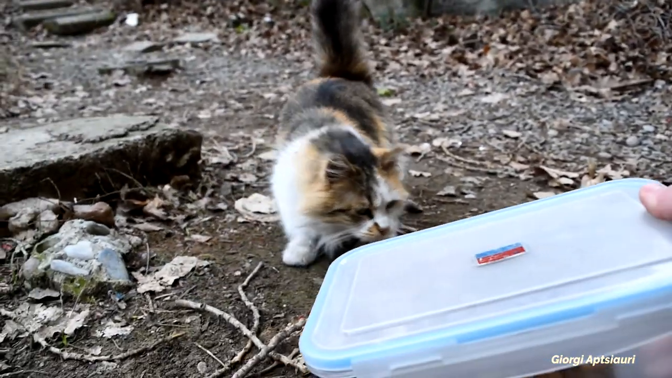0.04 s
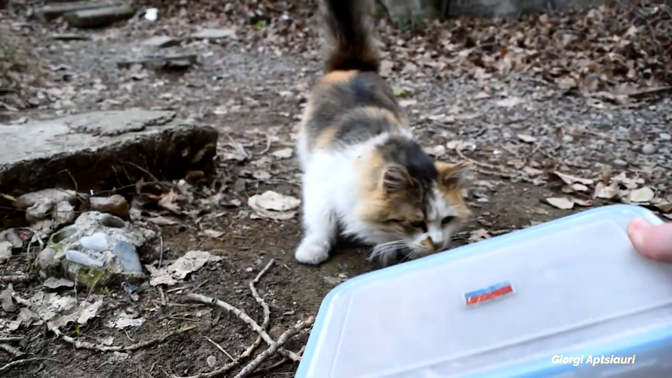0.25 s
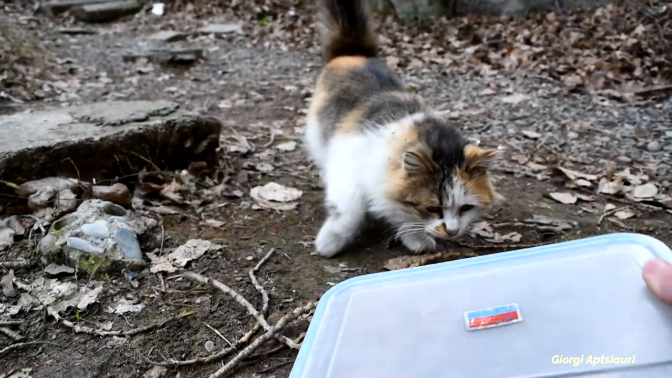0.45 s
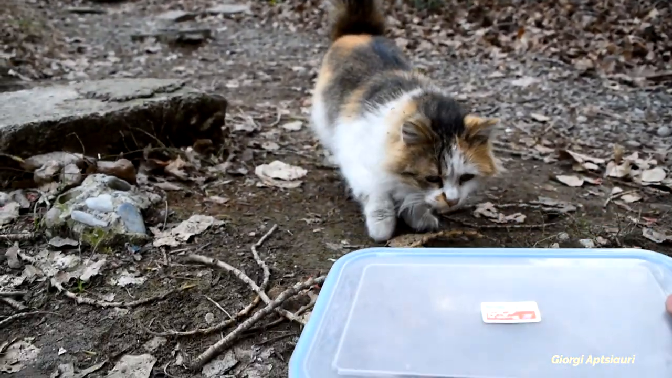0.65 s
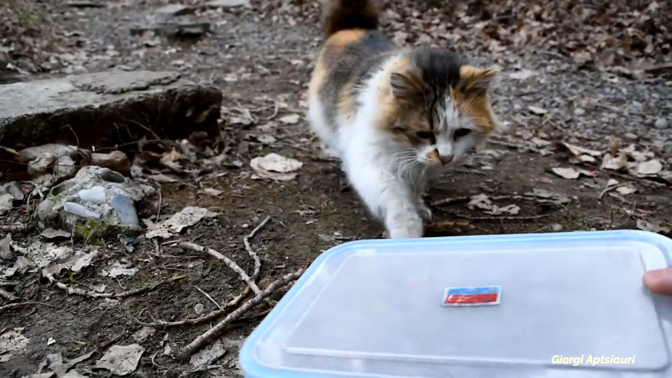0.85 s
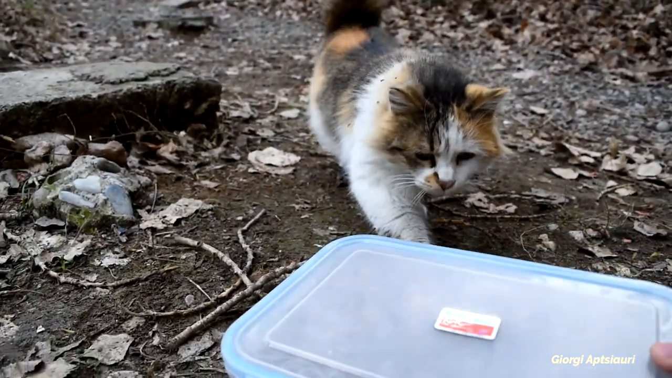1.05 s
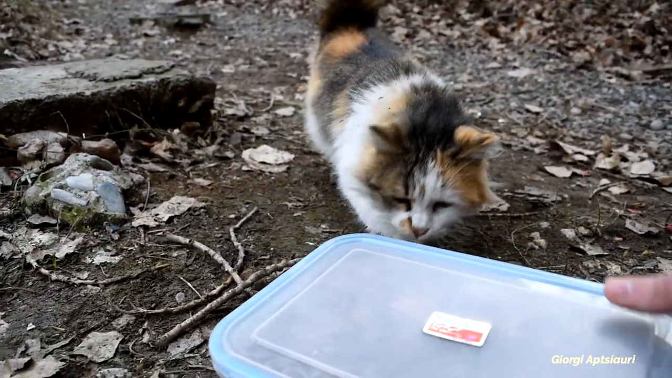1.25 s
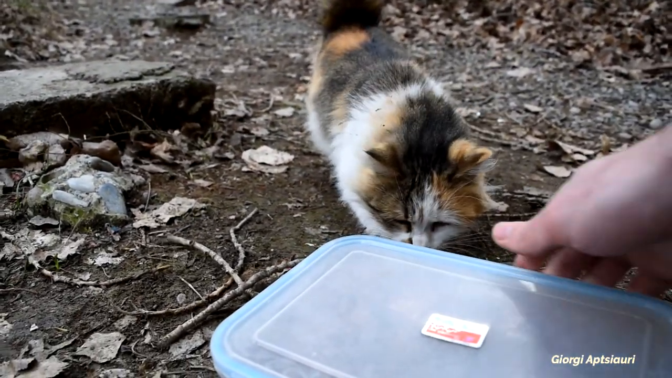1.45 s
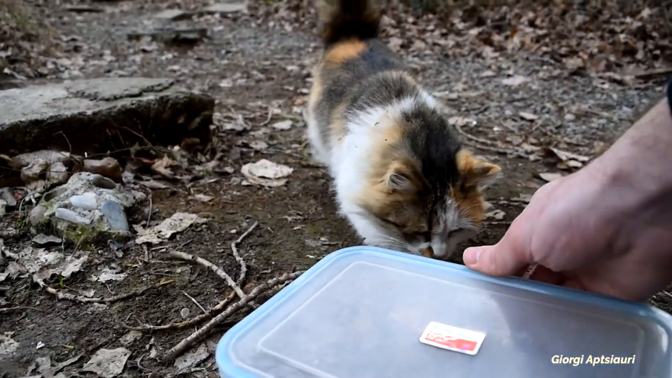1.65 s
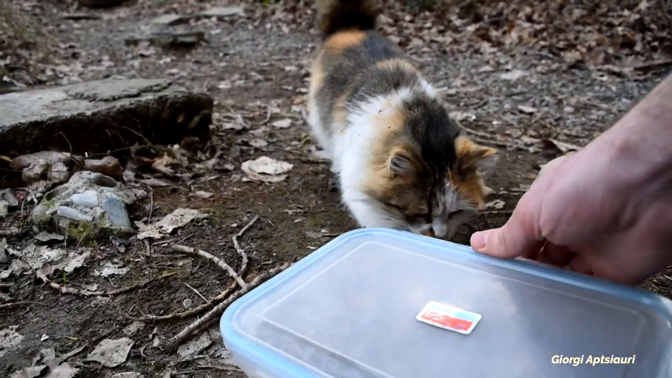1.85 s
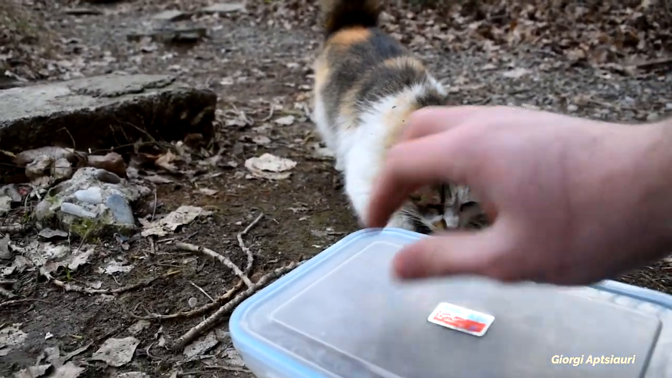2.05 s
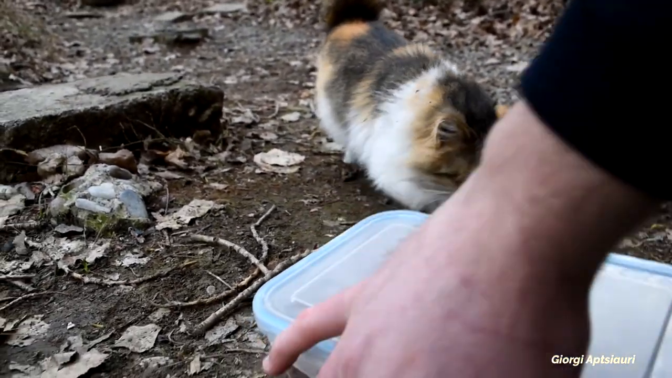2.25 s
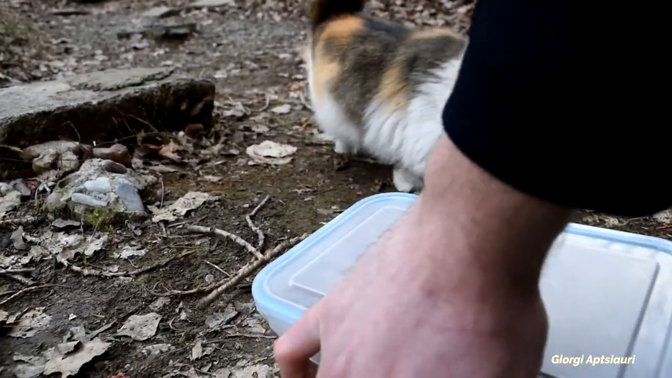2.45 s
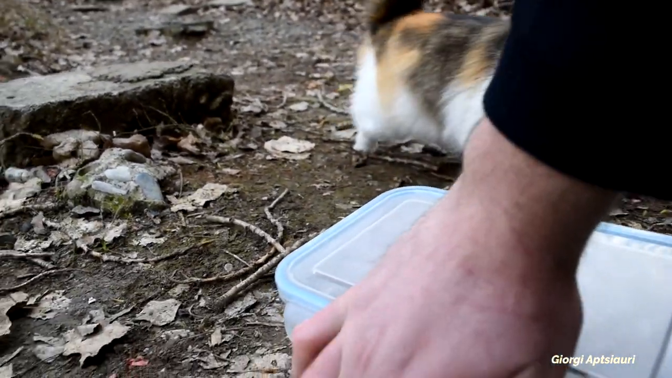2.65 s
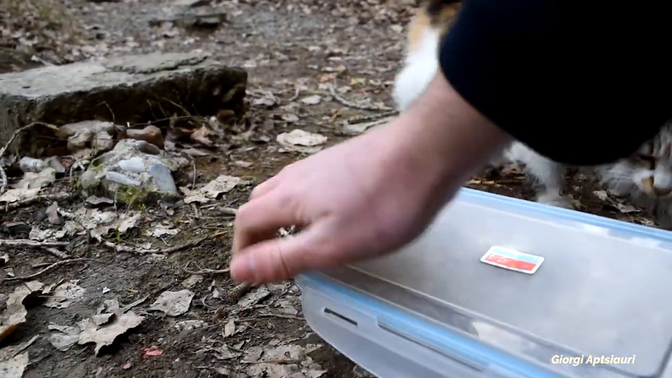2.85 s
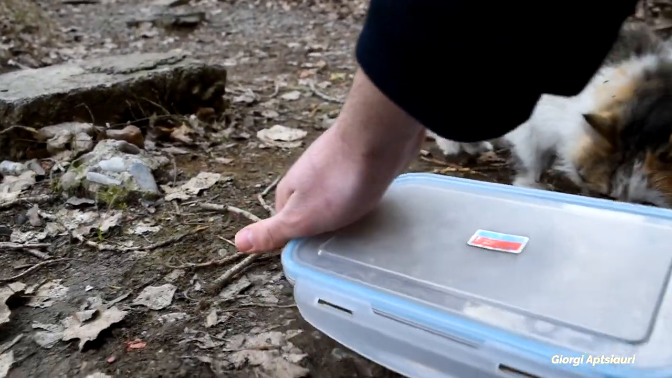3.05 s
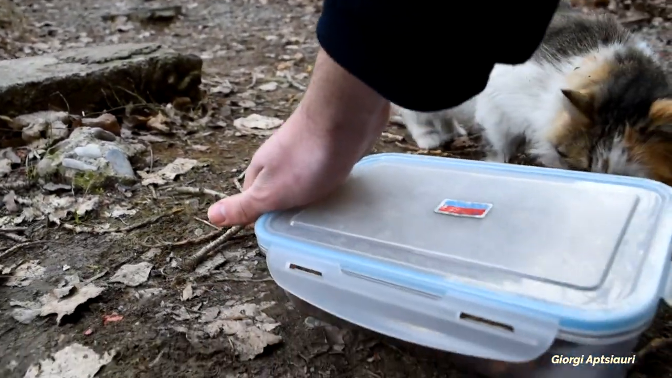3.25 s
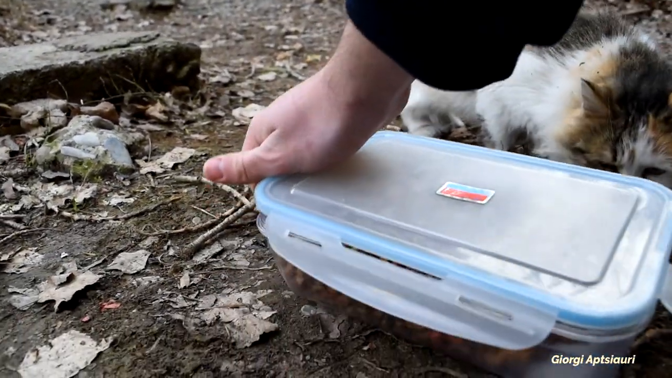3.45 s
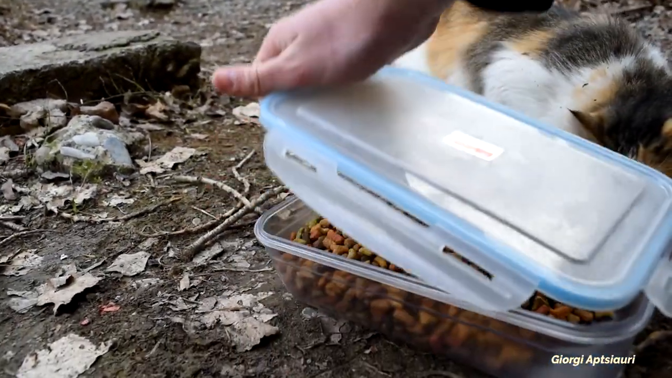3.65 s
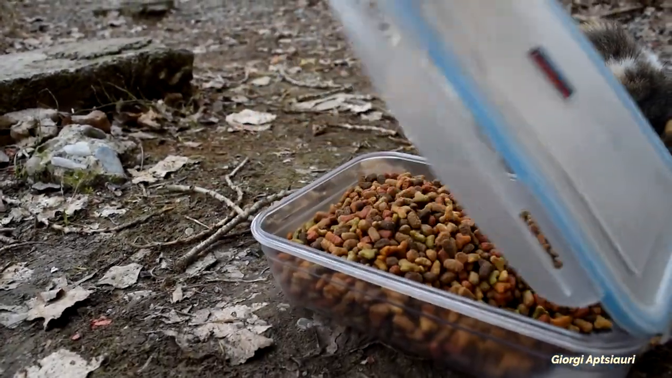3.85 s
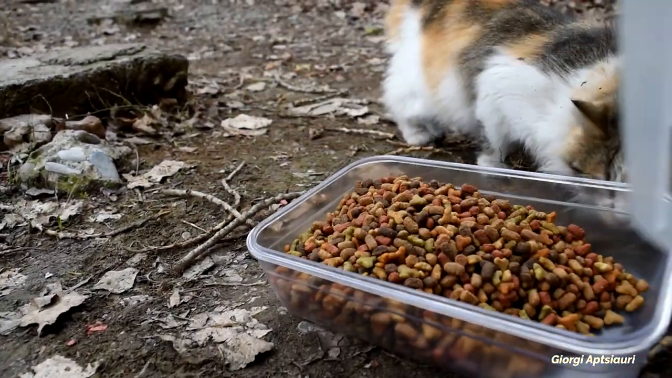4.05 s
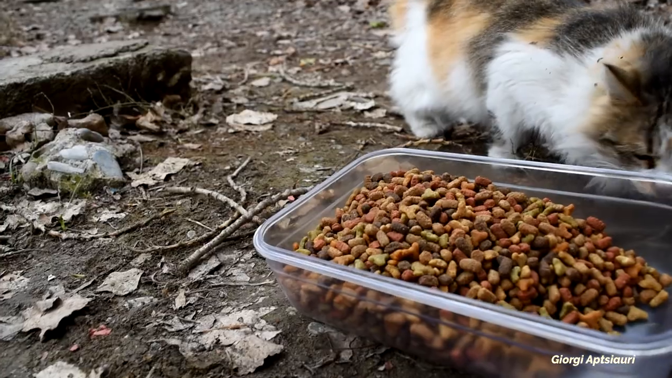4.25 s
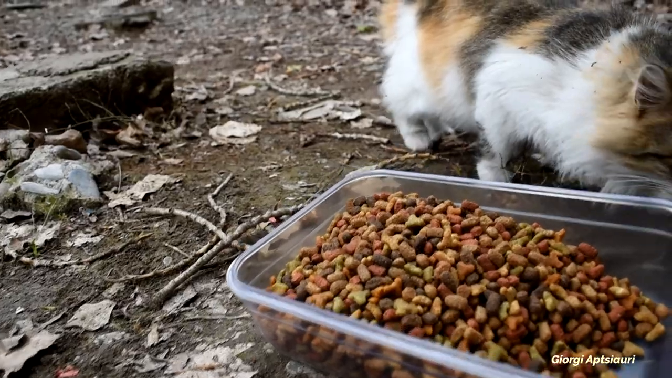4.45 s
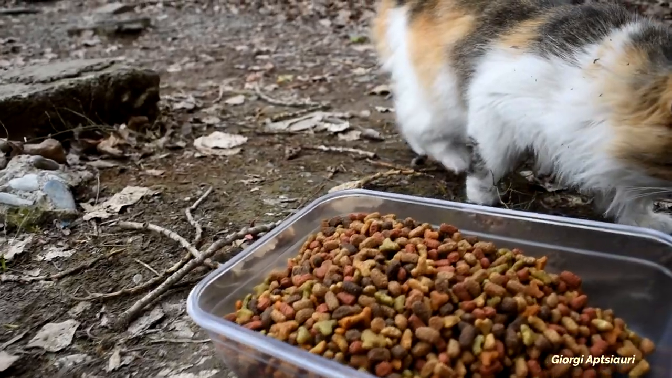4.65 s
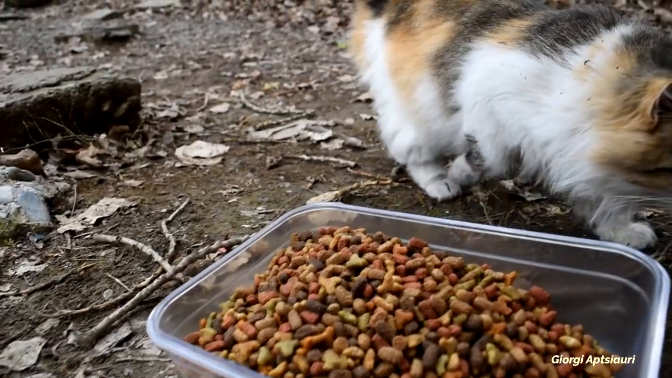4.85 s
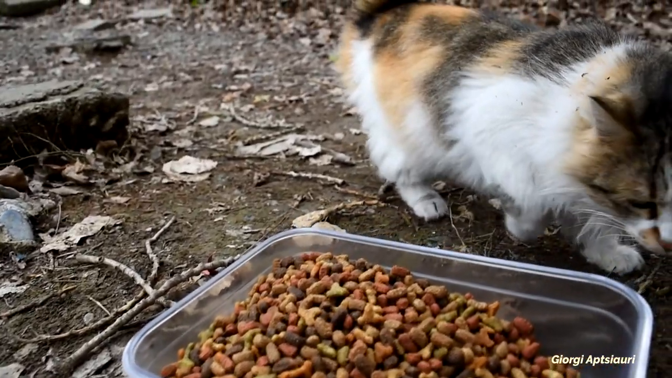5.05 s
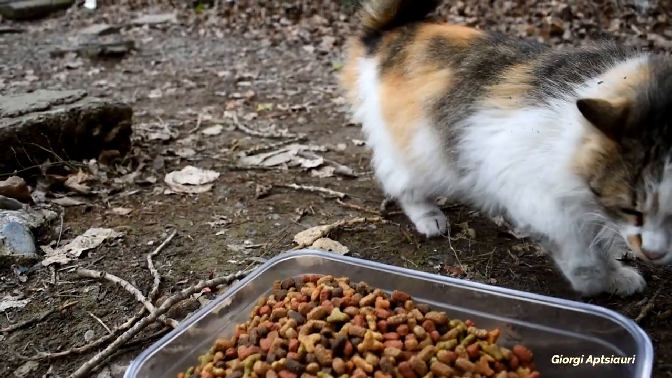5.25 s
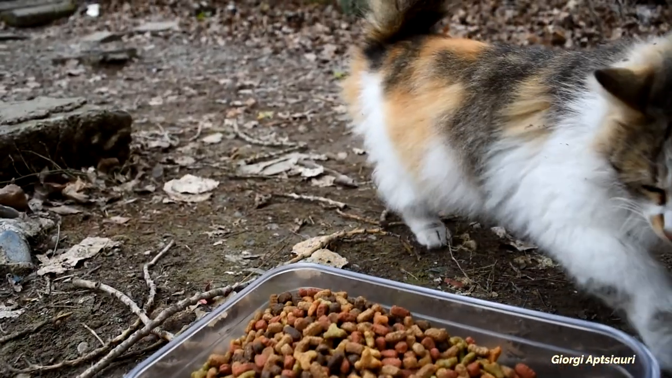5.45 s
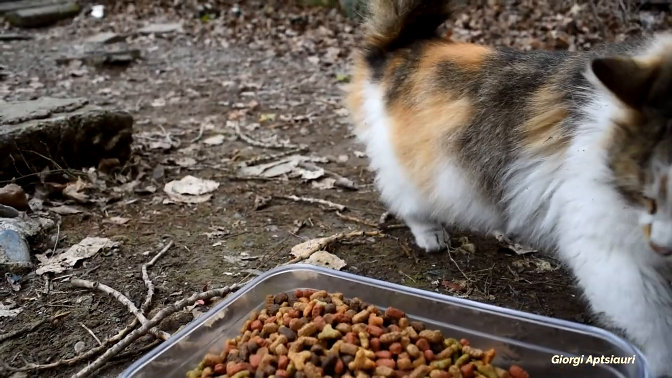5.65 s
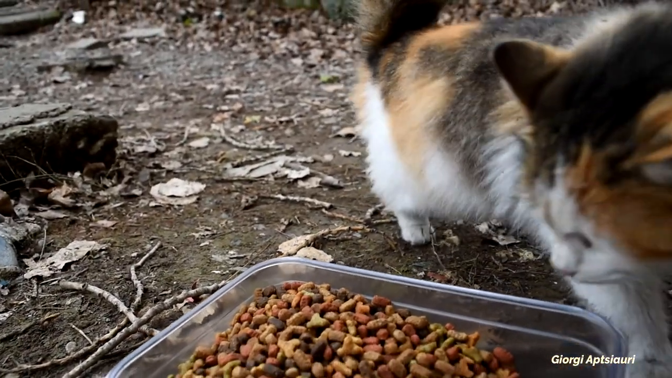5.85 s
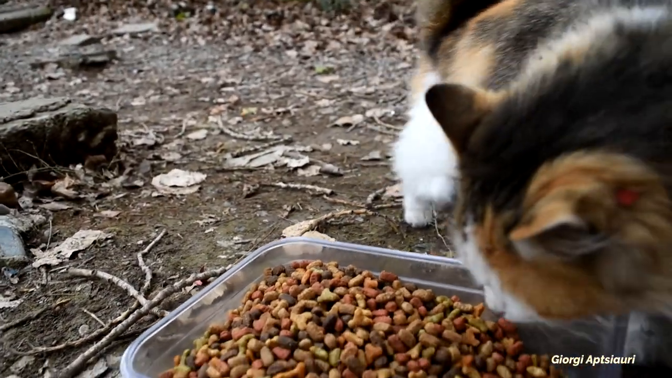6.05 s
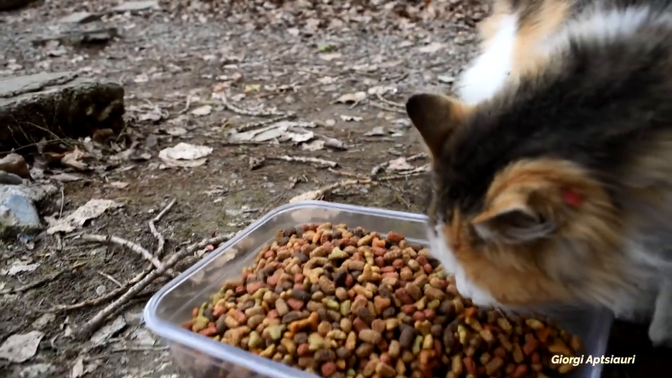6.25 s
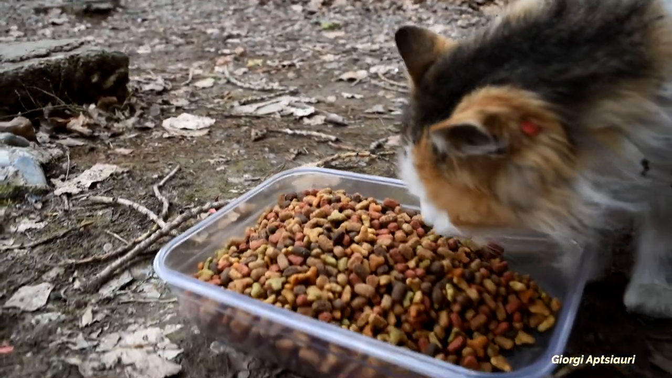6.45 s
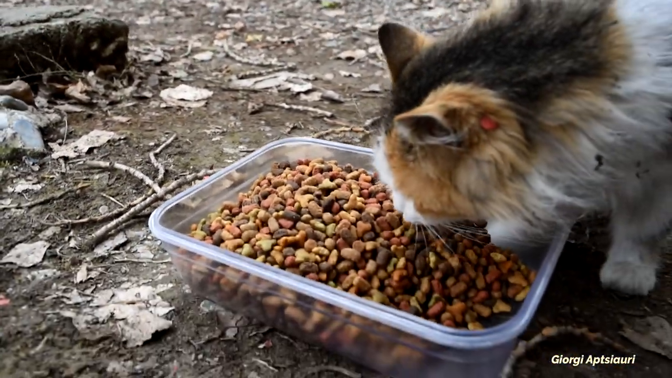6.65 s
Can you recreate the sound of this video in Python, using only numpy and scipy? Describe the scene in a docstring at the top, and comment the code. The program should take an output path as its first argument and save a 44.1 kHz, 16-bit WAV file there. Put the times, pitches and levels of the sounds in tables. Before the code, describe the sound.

Close plastic clicks, dull box thumps and a loose lid clatter, then sharp scrapy ticks to the right, with far sparrow chirps and low traffic.

```python
"""A hard tick and a brush of sleeves come first, close by, over far town rumble and a faint whine.
Then a plastic food box is unlatched and opened outdoors: pops and lid knocks ring decaying modes,
while ticks, scuffs, short hollow notes, rustles and one long dull swell are shaped noise.
Far off a sparrow chirps as sliding sines with echoes; the rumble is noise with resonant drones,
and the electronics whine as a stack of high overtones."""
import sys
import numpy as np
from scipy import signal
from scipy.fft import rfft, irfft, next_fast_len
from scipy.io import wavfile

SR = 44100
rng = np.random.default_rng(int(sys.argv[2]) if len(sys.argv) > 2 else 0)


def transcribe(signal):
    """Save signal, clipped to [-1, 1], as a 16-bit WAV file at the path in sys.argv[1]."""
    frames = np.atleast_2d(signal).T
    limited = np.clip(frames, -1, 1)
    pcm = np.round(limited * 32767).astype(np.int16)
    wavfile.write(sys.argv[1], SR, pcm)


def rack_gain(trim_db):
    """Turn a fader trim in dB into the linear factor to multiply a signal by."""
    fader = np.asarray(trim_db, float)
    return 10 ** (fader / 20)


N = 295639
TIME = np.arange(N) / SR
HZ = np.fft.rfftfreq(N, 1 / SR) + 1     # the offset keeps the log axis finite


def rms_one(x):
    """Scale to rms 1."""
    return x / np.sqrt(np.mean(x ** 2) + 1e-20)


def in_time(rows):
    """Read the columns of a curve at every sample."""
    s, *columns = np.transpose(rows)
    return [np.interp(TIME, s, c) for c in columns]


def at_hz(points, hz):
    """Read a spectrum on a log frequency axis."""
    point_hz, point_db = np.transpose(points)
    return np.interp(np.log(hz), np.log(point_hz), point_db)


def drift(rate_hz):
    """Random wander of rms 1, with nothing faster than about rate_hz."""
    count = int(N / SR * rate_hz * 2) + 3
    return rms_one(signal.resample(rng.standard_normal(count), N))


def resonance(x, hz, width_hz):
    """Two-pole band with gain 1 on top."""
    r = np.exp(-np.pi * width_hz / SR)
    poles = [1, -2 * r * np.cos(2 * np.pi * hz / SR), r * r]
    return signal.lfilter([(1 - r * r) / 2, 0, (r * r - 1) / 2], poles, x)


def bell(middle, length, fade=None):
    """Smooth swell and fade; the fade may have a length of its own."""
    width = length if fade is None else np.where(TIME < middle, length, fade)
    return np.exp(-.5 * ((TIME - middle) / width) ** 2)


def near_noise(db, lag_us, blur_hz, pan_db):
    """Noise from close by on the right: it reaches the left microphone later and weaker."""
    right, own = rfft(rng.standard_normal((2, N)))
    alike = 1 / (1 + (HZ / blur_hz) ** 2)
    late = right * np.exp(-2e-6j * np.pi * HZ * lag_us)
    left = alike * late + np.sqrt(1 - alike ** 2) * own
    return rms_one(irfft(np.array([left * rack_gain(pan_db), right]) * rack_gain(db), N))


def struck(blows, modes, octaves, spread_db, lift_db, rounding):
    """A blow rings the modes near its contact pitch most; a harder contact is shorter and so higher."""
    s, db, hardness = np.transpose(blows)
    contact_hz = 150 * 2 ** (2.83 * hardness)
    chance = rng.standard_normal((len(s), len(modes)))
    out = np.zeros(N)
    for k, (hz, mode_db, t60) in enumerate(modes):
        near_db = -6 * (np.log2(hz / contact_hz) / octaves) ** 2
        clicks = np.zeros(N) + 1e-18
        clicks[(s * SR).astype(int)] = rack_gain(db + lift_db + mode_db + near_db + spread_db * chance[:, k])
        r, w = rack_gain(-60 / (t60 * SR)), 2 * np.pi * hz / SR
        ring = signal.lfilter([0, np.sin(w)], [1, -2 * r * np.cos(w), r * r], clicks)
        out += resonance(ring, hz, rounding * hz)     # the soft contact rounds the start
    # a small box cannot radiate deep bass
    return signal.sosfilt(signal.butter(2, 140, "high", fs=SR, output="sos"), out)


# blows on the closed box: t/s, relative peak level/dB, hardness (0-1)
BOX_BLOWS = [(0.586, -38, 0.13), (0.9304, -19.5, 0.49), (0.9354, -25, 0.1), (0.952, -42, 0.6),
             (0.975, -44, 0.42), (0.984, -43, 0.22), (1.576, -35.5, 0.08), (1.658, -39.5, 0.01),
             (1.7748, -17.5, 0.31), (1.7804, -29, 0.54), (1.797, -44, 0.6), (1.972, -38, 0.29),
             (2.415, -45, 0.47), (2.565, -45, 0.7), (2.5727, -25, 0.19), (2.5777, -29, 0.31),
             (2.764, -44.5, 0.42), (2.776, -50, 0.53), (3.021, -28, 0), (3.098, -35.5, 0.01),
             (3.129, -33, 0.07), (3.235, -15.5, 0.15), (3.243, -47, 1), (3.257, -35, 0.27)]
# ringing modes of the hollow box: f/Hz, relative level/dB, decay by 60 dB t/s
BOX_MODES = [(184.3, 1, 0.098), (226.6, 1.5, 0.051), (264, -2, 0.038), (309, 8.5, 0.028), (387, 6, 0.024),
             (459, 8, 0.023), (509, 7, 0.02), (560, -1.5, 0.03), (870, 4, 0.034), (1190, 4, 0.041)]
# from then on a hand rests on the box: the deepest mode is stilled, the next ones carry the blow
PRESSED_S, PRESSED_DB = 2.3, 2


def box():
    """Latches pop and blows ring the hollow box, free at first, then under a hand."""
    free = [row for row in BOX_BLOWS if row[0] < PRESSED_S]
    pressed = [(s, db + PRESSED_DB, hard) for s, db, hard in BOX_BLOWS if s >= PRESSED_S]
    settings = dict(octaves=0.78, spread_db=3.5, lift_db=-8.5, rounding=0.54)
    return -(struck(free, BOX_MODES, **settings) + struck(pressed, BOX_MODES[1:], **settings))


# knocks of the loose lid: t/s, relative peak level/dB, hardness (0-1)
LID_KNOCKS = [(3.496, -38, 0.53), (3.505, -23.5, 0.32), (3.527, -23, 0.48), (3.541, -33, 0.3),
              (3.566, -34, 0.45), (3.576, -27.5, 0.63), (3.585, -35, 0.96), (3.593, -39, 0.5),
              (3.602, -39, 0.3), (3.61, -29, 0.56), (3.624, -26, 0.47), (3.631, -25, 0.75),
              (3.654, -41.5, 0.84), (3.813, -39, 0.67), (3.822, -43, 0.6), (3.834, -41.5, 0.58),
              (3.845, -39, 0.6), (3.859, -39, 0.92), (3.876, -45, 0.7), (3.901, -45, 0.58),
              (3.911, -44.5, 0.5), (3.95, -37, 0.84), (3.961, -37.5, 0.7), (3.974, -44, 0.8),
              (3.9965, -27.5, 0.82), (4.608, -30, 0.57), (4.628, -38, 0.57), (4.81, -36.5, 0.53),
              (4.871, -45, 0.7)]
# ringing modes of the lid: f/Hz, relative level/dB, decay by 60 dB t/s
LID_MODES = [(269, -17, 0.048), (351, -3.5, 0.021), (412, 4, 0.019), (475, -6.5, 0.041), (586, 7.5, 0.027),
             (679, 0.5, 0.022), (795, -8, 0.022), (1000, -7, 0.027)]


def lid():
    """The loose lid rattles: soft and hard knocks ring its own short modes."""
    return struck(LID_KNOCKS, LID_MODES, octaves=0.56, spread_db=3.0, lift_db=-4.5, rounding=0.35)


# hard ticks of plastic edges and grit: t/s, relative peak level/dB, centre f/Hz, relative treble level/dB
EDGE_TICKS = [(0.058, -32.5, 3500, -38), (0.0874, -46.5, 3040, -65), (0.38, -41, 1280, -54),
              (0.529, -46, 2600, -61), (0.602, -44, 1190, -48.5), (0.9293, -29.5, 1180, -41.5),
              (1.284, -46, 3300, -68), (1.4317, -27.5, 1170, -68), (1.6842, -41.5, 3580, -51),
              (1.706, -60, 1700, -50), (1.7725, -32.5, 1640, -53), (2.4155, -46, 940, -58),
              (2.5711, -31.5, 980, -36.5), (2.589, -38.5, 2480, -62), (3.099, -38, 905, -61),
              (3.192, -35, 1400, -52), (3.2026, -37, 1100, -52), (3.23, -40, 1640, -40),
              (3.2455, -36, 2200, -54), (3.264, -36, 1140, -69), (3.319, -50, 3000, -67),
              (3.3687, -39, 902, -75), (3.373, -40, 1050, -68), (3.3758, -34, 1000, -69),
              (3.3792, -31, 970, -64), (3.3982, -35, 1090, -60), (3.4169, -34, 1000, -65),
              (3.43, -40, 980, -67), (3.504, -42, 1100, -62), (3.5253, -33.5, 1260, -48.5),
              (3.5667, -38, 1300, -60), (3.609, -43, 1000, -64), (3.6285, -35, 1210, -64),
              (3.812, -45.5, 1500, -64), (3.996, -35.5, 1510, -58), (4.5775, -30, 1300, -31.5),
              (4.5854, -28.5, 4480, -29), (4.5977, -19, 4530, -33), (4.6061, -19.5, 2200, -30.5),
              (4.628, -37.5, 1860, -52), (4.781, -48, 1200, -56), (4.7908, -52, 982, -45),
              (4.799, -35, 1080, -35), (4.8098, -31, 1660, -61), (4.816, -33.5, 1070, -39.5),
              (5.1258, -28, 1490, -75)]


def ticks(white):
    """A sharp slip and its dying rattle ring a centre, the rim near 2.3 kHz and a short-lived treble."""
    out, t = np.zeros((2, N)), np.arange(SR // 12) / SR
    for s, db, hz, treble_db in EDGE_TICKS:
        i = int(s * SR)
        t60 = 0.044 * rack_gain(0.032 * (db + 49.0))     # strong ticks rattle longer
        rattle = white[:, i:i + len(t)] * rack_gain(-60 * t / t60) * (1 - np.exp(-t / 0.00029))
        slip = rattle * rack_gain(-60 * t / 0.078) - 7.6 * (t == 0)
        centre = resonance(slip, hz, 0.62 * hz) * np.sqrt(SR / 4 / hz)
        rim = 0.7 * resonance(slip, 2300, 1700)
        # plastic is soft: the slip is not quite instant
        core = signal.lfilter([.36], [1, -.8, .16], centre + rim)
        brief = rattle * rack_gain(-60 * t / 0.02)     # the treble dies first
        edge = resonance(resonance(brief, 4800, 7200), 4800, 9000) * rack_gain(treble_db + 7.0)
        out[:, i:i + len(t)] += rack_gain(db - 5.5) * core + edge
    return out


# short gritty scuffs: middle t/s, rms level/dB, centre f/Hz, bell width t/s
GRIT_SCUFFS = [(0.55, -63, 1400, 0.02), (1.58, -46, 3380, 0.012), (3.177, -53, 2870, 0.0086),
               (3.252, -55.5, 2000, 0.0089), (3.857, -56.5, 680, 0.03), (3.962, -55.5, 700, 0.015),
               (4.013, -55, 2360, 0.014), (4.033, -46, 2340, 0.007), (4.037, -45.5, 1350, 0.006),
               (4.057, -49, 2300, 0.004), (4.847, -54, 3500, 0.0038)]


def scuffs(white):
    """Dense uneven grit under quick strokes, and one thin squeak from a narrow high band."""
    grit = white * rack_gain(3 * drift(400))
    squeak = rms_one(resonance(resonance(white, 12300, 300), 12300, 260))
    out = rack_gain(-43) * bell(4.796, 0.005) * squeak
    for s, db, hz, length in GRIT_SCUFFS:
        band = resonance(resonance(grit, hz, 0.5 * hz), 3100, 13000)
        out = out + rack_gain(db) * bell(s, length) * rms_one(band)
    return out


# faint hollow flutters: start t/s, relative peak level/dB, f/Hz
FLUTTERS = [(0.384, -53, 1020), (0.525, -42.5, 1386), (0.54, -51, 1220), (1.1558, -55, 1007),
            (1.2196, -55, 1030), (1.3329, -53, 1040), (2.3, -54, 1000), (5.3298, -57, 1045),
            (6.06, -52.5, 1015), (6.21, -54, 740), (6.221, -54, 1000), (6.255, -54, 1045),
            (6.283, -53, 1030), (6.305, -57, 1030), (6.33, -54, 1000)]


def pings():
    """Short soft notes of uneven strength, each a narrow band of noise under a bell."""
    white, out = rng.standard_normal(N), np.zeros(N)
    for s, db, hz in FLUTTERS:
        note = rms_one(resonance(resonance(white, hz, 110), hz, 120))
        out += rack_gain(db - 4.5) * bell(s + 0.0056, 0.0052, 0.0085) * note
    return out


# soft noise swells: strokes of sleeves and hands, and at 5.3 s a long dull swell, probably bird echoes:
# peak t/s, relative dull level/dB, relative bright level/dB, swell width t/s, fade width t/s
SOFT_SWELLS = [(0.06, -61.5, -72, 0.2, 0.071), (0.19, -64, -78, 0.075, 0.03), (0.55, -67.5, -68, 0.12, 0.1),
               (0.91, -70, -69, 0.11, 0.13), (1.26, -71, -73, 0.13, 0.17), (1.54, -56, -62, 0.1, 0.069),
               (1.74, -69, -69.5, 0.029, 0.086), (2.0, -61.5, -66.5, 0.067, 0.055),
               (2.1, -58, -64, 0.09, 0.071), (2.33, -74, -68.5, 0.11, 0.33),
               (2.62, -74, -77, 0.048, 0.0065), (2.97, -68, -65, 0.081, 0.11),
               (3.188, -56.5, -59, 0.054, 0.03), (3.9, -69.5, -66.5, 0.21, 0.33),
               (4.53, -65.5, -62, 0.11, 0.12), (4.9, -72, -68.5, 0.11, 0.027), (5.3, -67, -97, 0.83, 0.21),
               (6.0, -78, -69, 0.093, 0.14), (6.42, -75, -72, 0.12, 0.18)]
# colour of the soft noise: f/Hz, relative level/dB per Hz
RUSTLE_COLOUR = [(400, -9.5), (1000, -4), (1700, -2.5), (2800, -1), (4000, -3), (7000, -8), (10000, -8.5),
                 (12000, -18.5), (16000, -25)]


def rustle():
    """Fine grainy noise; each soft swell rises and fades with its own balance of dull and bright."""
    shapes = np.array([bell(s, swell, fade) for s, _, _, swell, fade in SOFT_SWELLS]) ** 2
    _, dull_db, bright_db, _, _ = np.transpose(SOFT_SWELLS)
    # swells add in power over a faint idle rustle
    dull_gain = np.sqrt(rack_gain(-75) ** 2 + rack_gain(dull_db) ** 2 @ shapes)
    bright_gain = np.sqrt(rack_gain(-86.5) ** 2 + rack_gain(bright_db) ** 2 @ shapes)
    colour = at_hz(RUSTLE_COLOUR, HZ)
    share = 1 / (1 + (HZ / 4800) ** 4)     # power given to the dull part
    dull = near_noise(colour + 10 * np.log10(share), 25.4, 14000, -0.57)
    bright = near_noise(colour + 10 * np.log10(1 - share), 24.0, 15000, -0.31)
    dull = dull * dull_gain * rack_gain(6.0 + 0.6 * drift(25))
    bright = bright * bright_gain * rack_gain(2.5 + 1.14 * drift(30))
    return (dull + bright) * rack_gain(1.66 * drift(500))     # the fast wander is the grain


# chirps: t/s, length t/s, held f/Hz, last f/Hz, relative level/dB
SPARROW_CHIRPS = [(3.754, 0.12, 3890, 3550, -62), (4.167, 0.096, 3970, 3110, -54.5),
                  (4.389, 0.092, 3710, 3020, -57.5), (4.628, 0.09, 3900, 3150, -54.5),
                  (4.9, 0.064, 5340, 4380, -67), (4.944, 0.075, 3600, 3050, -56),
                  (5.125, 0.056, 3420, 3160, -58.5), (5.388, 0.04, 5250, 4500, -70),
                  (5.418, 0.085, 3950, 2980, -58.5), (5.719, 0.1, 3994, 3054, -56.5),
                  (5.869, 0.017, 3940, 3760, -61), (6.518, 0.092, 3805, 2900, -61.5)]


def sparrow():
    """A whistle slides up, holds and falls late, a fainter strand above; trees and walls echo it."""
    voice = np.zeros(N)
    for s, length, held_hz, last_hz, db in SPARROW_CHIRPS:
        u = np.arange(int(length * SR)) / (length * SR)     # 0 to 1 through the chirp
        hz = held_hz + (last_hz - held_hz) * u ** 2.1 - 1200 * np.exp(-u / 0.059)
        # the upper strand tops out at 4.34 kHz, or at the whistle's own peak if that is higher
        upper_hz = np.clip(1.19 * hz, 0, max(4340, hz.max()))
        trill = 1 + 0.038 * np.sin(2 * np.pi * 70 * u * length)
        upper_trill = 1 + 0.038 * np.sin(2 * np.pi * 110 * u * length)
        phase = 2 * np.pi * np.cumsum(hz * trill) / SR
        upper = 2 * np.pi * np.cumsum(upper_hz * upper_trill) / SR
        strands = np.sin(phase) + 0.66 * np.sqrt(1 - u) * np.sin(upper)
        i = int(s * SR)
        voice[i:i + len(u)] += rack_gain(db + 3) * np.sin(np.pi * u ** 1.2) * strands
    voice = voice * rack_gain(2.04 * drift(60) + 2.9 * drift(250))     # a hoarse flutter
    t = np.arange(SR) / SR
    tail = rack_gain(-60 * t / 0.85) + 1.2 * rack_gain(-60 * t / 0.21)     # a long and a short decay
    echoes = rng.standard_normal((2, len(t))) * tail
    echoes = echoes / np.sqrt(np.sum(echoes ** 2, axis=1, keepdims=True))
    shared, own = signal.fftconvolve(voice[None], echoes, axes=1)[:, :N]
    return rack_gain(-2.0) * voice + rack_gain(0.5) * (shared + 0.32 * own * [[1], [-1]])


# likeness of far sound at the two microphones: f/Hz, left-right correlation (-1 to 1)
FAR_LIKENESS = [(60, 0.999), (130, 0.999), (290, 0.98), (640, 0.93), (1410, 0.96), (3100, 0.75),
                (6820, 0.19), (15000, 0.038)]


def wide_noise(db):
    """Far noise at two close microphones: alike in the bass, unrelated in the treble; db per frequency."""
    mid, side = rfft(rng.standard_normal((2, N)))
    alike = np.clip(at_hz(FAR_LIKENESS, HZ), -1, 1)
    both = np.sqrt(1 + alike) * mid + np.sqrt(1 - alike) * side * [[1], [-1]]
    return rms_one(irfft(both * rack_gain(db), N))


def steady(x, share):
    """Even out part of the level swings of a narrow band."""
    envelope = np.abs(signal.hilbert(x, next_fast_len(N))[:N])
    return rms_one(x / (envelope + 0.31) ** share)


# colour of the town roar: f/Hz, relative level/dB per Hz
TOWN_COLOUR = [(12, -60), (20, -26), (49, -2), (151, 0.5), (361, -8.5), (652, -7), (913, -10), (1020, -8),
               (1350, -12.5), (1560, -8.5), (2310, -22), (9140, -27), (12100, -30.5), (15200, -33),
               (16500, -59)]
# far traffic over time: t/s, relative roar level/dB, then the level/dB of each of the three drones
TRAFFIC = [(0.0, -64, -81, -70, -69), (0.49, -63, -65.5, -68.5, -74.5), (4.0, -63, -66, -68, -77.5),
           (5.34, -63.5, -65, -65.5, -81), (6.7, -64.5, -70, -69, -74)]
# far engine drones: f/Hz, width of each of two filter passes f/Hz
ENGINE_DRONES = [(58, 3.9), (146, 9.8), (1517, 2.1)]


def town():
    """Far traffic that swells slowly: coloured noise, with wavering drones of narrow-band noise."""
    roar_db, *drone_db = in_time(TRAFFIC)
    out = wide_noise(at_hz(TOWN_COLOUR, HZ)) * rack_gain(roar_db + 4.5)
    for db, (hz, width_hz) in zip(drone_db, ENGINE_DRONES):
        white = rng.standard_normal(N)
        band = rms_one(resonance(resonance(white, hz, width_hz), hz, width_hz))
        out = out + rack_gain(db) * steady(band, 0.81)
    return out


# envelope of the electrical overtones: f/Hz, relative level/dB of each overtone
WHINE_COLOUR = [(12500, -110), (13496, -95), (14200, -106), (14917, -96), (15600, -104)]


def whine():
    """High overtones of an electrical buzz: nearly in step, so they tick once a cycle."""
    out = np.zeros(N)
    for hz in 142.07 * np.arange(88, 110):
        phase = 0.5 * rng.standard_normal()
        out += rack_gain(at_hz(WHINE_COLOUR, hz) + 5.5) * np.sin(2 * np.pi * hz * TIME + phase)
    return out


def scene():
    """Everything at the two microphones; from 4.5 s the ticks and scuffs lie far to the right."""
    ahead = near_noise(0, 24.6, 32000, -0.43)
    aside = near_noise(0, 45, 20000, -3.5)
    white = np.where(TIME < 4.5, ahead, aside)
    close_by = box() + lid() + ticks(white) + scuffs(white) + pings()
    return close_by + rustle() + sparrow() + town() + whine()


def low_pass(x):
    """Removes everything above the highest recorded frequency."""
    return signal.sosfilt(signal.butter(12, 16640, fs=SR, output="sos"), x)


def record(dry):
    """A steep low-pass cuts the top, 30 dB down from 16.1 kHz, to finish the mix."""
    mix = signal.sosfilt(signal.cheby2(10, 30, 16100, fs=SR, output="sos"), dry)
    return low_pass(mix)


dry = scene()
out = record(dry)
transcribe(out)
```